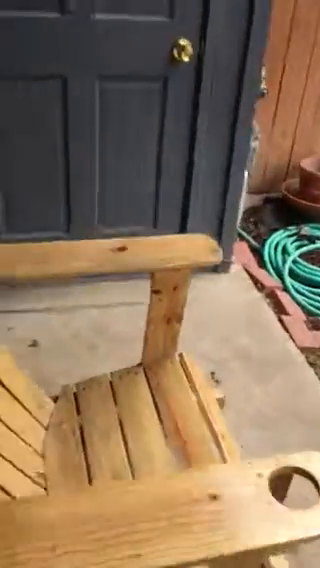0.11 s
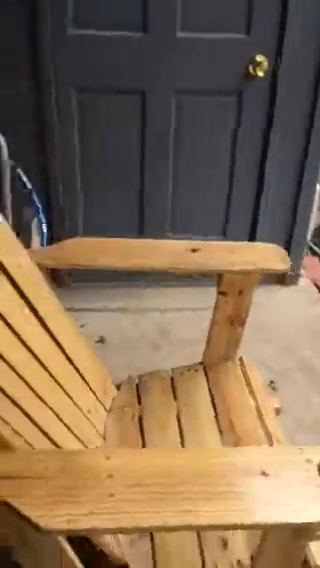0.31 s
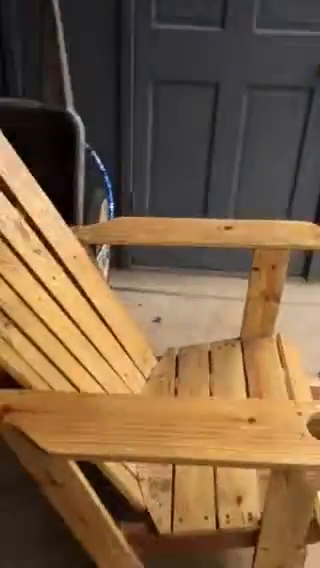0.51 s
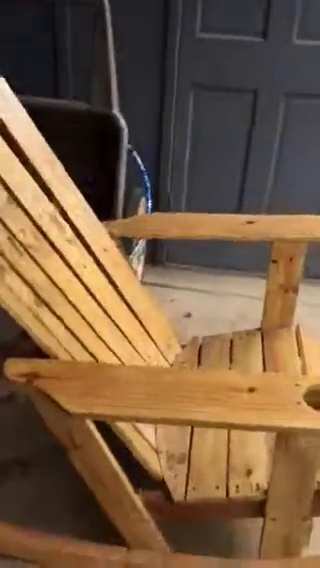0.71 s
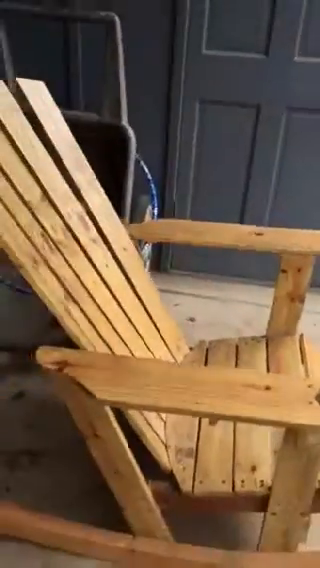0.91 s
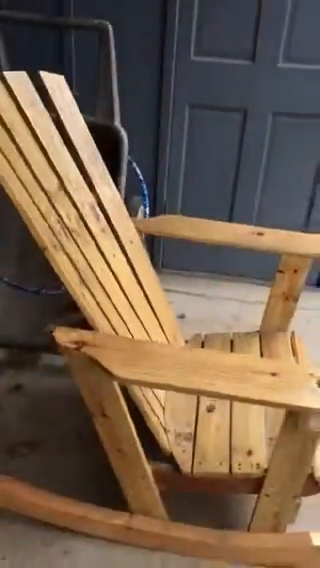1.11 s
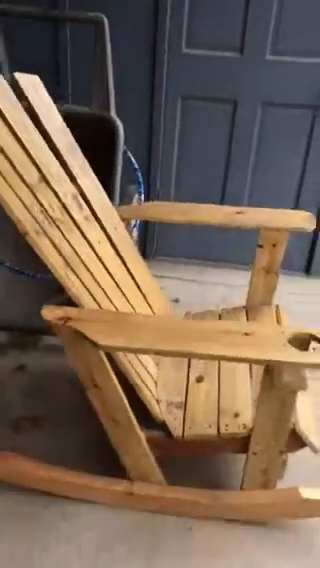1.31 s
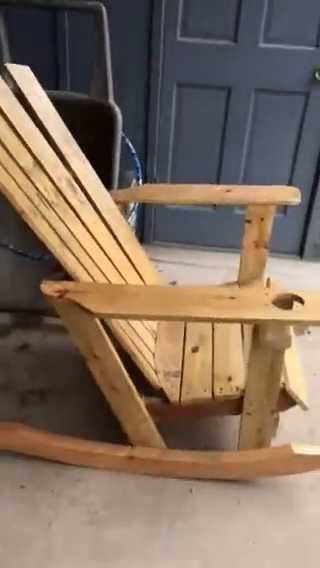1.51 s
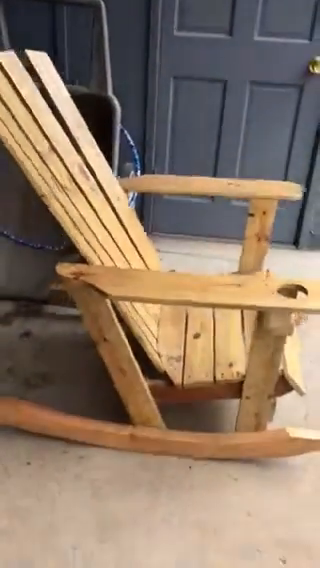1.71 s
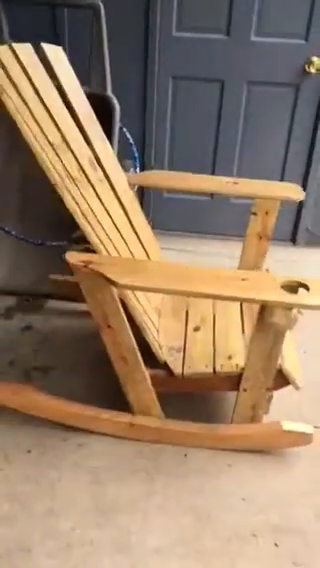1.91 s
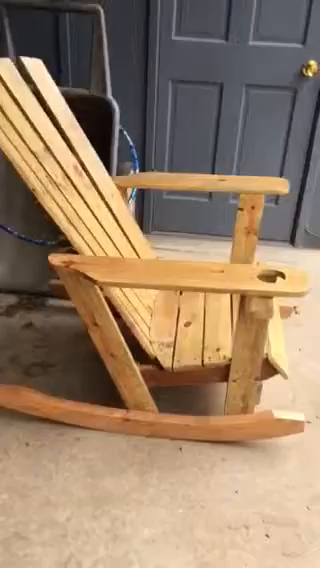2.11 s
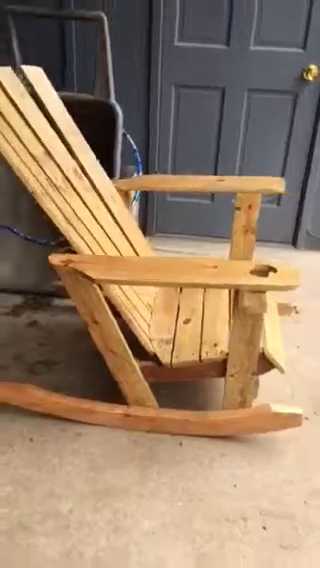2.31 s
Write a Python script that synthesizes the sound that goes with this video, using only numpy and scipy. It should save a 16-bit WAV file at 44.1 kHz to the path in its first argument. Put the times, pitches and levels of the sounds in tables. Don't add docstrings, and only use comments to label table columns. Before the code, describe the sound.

Loose wooden joints of a rocking chair crack and thump over a faint low room hum

```python
import sys
import numpy as np
from scipy import signal
from scipy.fft import rfft, irfft
from scipy.io import wavfile
from scipy.ndimage import uniform_filter1d

SR = 44100
rng = np.random.default_rng(int(sys.argv[2]) if len(sys.argv) > 2 else 0)


def voltage_ratio(decibels):
    exponent = np.asarray(decibels, float) / 20
    return 10 ** exponent


def waveform_to_disk(signal):
    frames = np.transpose(np.atleast_2d(signal))
    scaled = np.clip(frames, -1, 1) * 32767
    samples = np.round(scaled).astype(np.int16)
    wavfile.write(sys.argv[1], SR, samples)


N = 110250
T = np.arange(N) / SR

# start in seconds, crack level in dB, wood level in dB, wood centre in Hz,
# rattle length in seconds.
JOINT_KNOCKS = [(.164, -50.5, -58.5, 1460, 0.013), (0.2172, -25.5, -44.5, 4270, 0.0054),
                (.218, -63, -41, 960, 0.019), (.2470, -20.5, -28.5, 2780, 0.0075),
                (.248, -47, -31, 1340, 0.012), (0, -82, -72.5, 3150, 0.034), (.538, -69, -46.5, 850, 0.02),
                (0.5393, -28.5, -31, 2150, 0.005), (0.5593, -27, -39, 1850, 0.0047),
                (0.7157, -37.5, -48, 1770, 0.0059), (.718, -79, -55, 960, 0.0068),
                (1.044, -39.5, -61.5, 2630, 0.0039), (1.05, -63, -56, 1430, 0.045),
                (1.078, -43.5, -65, 2900, 0.018), (1.5132, -40, -44, 4950, 0.001),
                (1.5159, -72, -38.5, 1690, 0.0011), (1.339, -65, -61, 1260, 0.032),
                (1.473, -57, -61, 1830, 0.071), (.249, -76, -47, 604, 0.042), (1.88, -83, -65, 1340, 0.015),
                (2.058, -80, -59.5, 1080, 0.04), (2.1477, -76, -65, 1480, 0.042),
                (2.263, -69, -65, 840, 0.074)]
MORE_KNOCKS = [(.205, -83, -44, 150, 0.023), (.218, -60, -44, 2070, 0.015),
               (.2485, -48, -35.5, 2040, 0.021), (.25, -80, -39, 546, 0.016),
               (.2535, -32.5, -33, 4160, .008), (.2635, -41.5, -45, 3520, .006),
               (.533, -90, -44.5, 342.6, 0.05), (.537, -36, -35, 3240, 0.0066),
               (.567, -48, -48, 2000, 0.0069), (.575, -80, -47, 212, 0.038),
               (1.0445, -86, -54, 1640, 0.0023), (1.125, -90, -50.5, 200, 0.035),
               (1.365, -93, -49.5, 278, 0.013), (1.494, -74, -56, 1500, .003),
               (1.505, -80, -55, 1900, 0.0018), (1.514, -80, -49.5, 1030, .008),
               (1.5145, -69, -50.5, 3520, 0.0051), (1.5184, -70, -43.5, 1790, 0.0011),
               (1.5255, -42, -60, 5830, 0.0043), (1.617, -77, -68, 4200, .002),
               (1.8217, -65, -82, 2800, 0.0024), (2.052, -76, -61.5, 1390, 0.0023),
               (2.056, -80, -70, 4360, 0.026), (1.7, -58, -78, 3240, 0.0026),
               (2.149, -79, -64, 3300, 0.014), (2.257, -63, -84, 3000, 0.0083),
               (2.2655, -90, -59, 820, .004)]
# frequency in Hz, level in dB.
CRACK_COLOUR = [(1000, -29), (3000, -4.5), (6000, 0.5), (10000, -3), (16000, -12)]
# start in seconds, pitch in Hz, level in dB, t60 in seconds.
SLAT_RINGS = [(0.218, 1017, -38, 0.084), (.2175, 2070, -41.5, 0.056), (.2175, 5960, -47, 0.027),
              (0.217, 6640, -37, .018), (.219, 3500, -34.5, 0.033), (.25, 1240, -42.5, 0.074),
              (.252, 1558, -44.5, 0.18), (.254, 2324, -40.5, 0.078), (.475, 1840, -37, 0.0091),
              (.539, 2220, -35, 0.044), (0.538, 2590, -49, 0.02), (0.541, 1882, -36.5, 0.097),
              (0.551, 1224, -46.5, 0.085), (.716, 887, -48, 0.042), (.716, 2082, -61, 0.17),
              (1.044, 2705, -52.5, 0.035), (1.045, 4360, -58, 0.034), (1.078, 3540, -52.5, 0.031),
              (1.076, 4600, -67, 0.062), (1.078, 5810, -59.5, 0.054), (1.5145, 1310, -50, 0.046),
              (1.5145, 2150, -56, .06), (1.515, 4210, -58, 0.069), (1.5158, 1620, -54, .05),
              (1.525, 1755, -61, .25)]
# start in seconds, low mode in dB, middle modes in dB,
# upper modes in dB, roll length in seconds.
FRAME_THUDS = [(0.043, -59.5, -64, -63.5, 0.044), (0.2, -43.5, -40.5, -45.5, 0.012),
               (0.226, -56, -55, -44.5, 0.071), (0.396, -51.5, -58, -67, 0.013),
               (0.529, -39, -32.5, -35, 0.02), (0.628, -50, -46.5, -49.5, 0.021),
               (1.041, -47.5, -57, -78, 0.024), (1.081, -45, -44.5, -50, 0.039),
               (1.343, -48.5, -46, -43, 0.011), (1.364, -40, -40, -47.5, 0.013),
               (1.484, -55, -52.5, -63, 0.042), (1.698, -55.5, -56.5, -69, 0.084),
               (1.854, -49, -47, -62, 0.051), (2.114, -45.5, -39, -49.5, 0.029),
               (2.136, -44.5, -39.5, -43.5, 0.031), (2.193, -44.5, -47, -51.5, 0.013)]
# pitch in Hz, level in dB, t60 in seconds.
FRAME_MODES = [(58.4, 6.5, 0.22), (106.2, -4, 0.45), (127.6, -2.5, 0.34), (282.4, -4, 0.24),
               (247.4, -9.5, 0.12), (354.3, -7, 0.03), (445.2, -17, 0.042)]
# start in seconds, level in dB, scrape length in seconds.
GRIT_TICKS = [(0.056, -53.5, 0.0025), (0.117, -53.5, 0.0024), (0.21, -40.5, 0.0025), (0.299, -63, 0.51),
              (0.523, -46, 0.014), (0.532, -34, 0.005), (0.572, -53, 0.086), (0.6276, -39, 0.0019),
              (0.705, -29, 0.00076), (0.742, -41, 0.0024), (1.365, -47, 0.0025), (1.373, -59, 0.013),
              (1.389, -42.5, 0.0014), (1.455, -59, 0.026), (1.51, -52, 0.0016), (1.805, -56.5, 0.0045),
              (1.827, -59.5, 0.0073), (1.835, -56, 0.0051), (1.873, -52, 0.0073), (2.057, -65.5, 0.051),
              (2.1065, -61, 0.012), (2.144, -56.5, 0.015), (2.194, -61, 0.0067), (2.237, -61, 0.029),
              (2.277, -45, 0.0018), (2.302, -51, 0.003)]
# frequency in Hz, level in dB.
GRIT_COLOUR = [(700, 13.5), (2000, 10), (4500, 0.5), (6000, 6.5), (7500, -2), (9300, 3.5), (12000, -4.5),
               (16000, -6)]
# frequency in Hz, t60 in seconds.
ROOM_DECAY = [(200, 0.2), (1000, 0.21), (3000, 0.21), (8000, 0.15), (14000, 0.16)]
# frequency in Hz, level in dB per Hz.
AIR_COLOUR = [(15, -20), (25, -0.5), (82, -2.5), (141, -10), (887, -23.5), (1190, -26), (2990, -40.5),
              (3620, -40), (16000, -52)]
# time in seconds, level in dB.
AIR_SWELL = [(0, 0.5), (.35, 2.5), (.7, 3), (1.1, 2.5), (1.7, 0.5), (2.5, 2.5)]
# time in seconds, level in dB.
HUM_LEVEL = [(0, -61.5), (.6, -53), (.8, -53), (1.3, -55), (1.6, -61), (2.5, -60.5)]


def unit(x):
    return x / np.sqrt(np.mean(x ** 2) + 1e-30)


def loud(x, span_s):
    return x / np.sqrt(uniform_filter1d(x ** 2, int(span_s * SR)).max() + 1e-30)


def read(table, hz):
    f, v = np.array(table, float).T
    return np.interp(np.log(np.maximum(hz, 1)), np.log(f), v)


def colour(x, table):
    n = x.shape[-1]
    return irfft(rfft(x) * voltage_ratio(read(table, np.fft.rfftfreq(n, 1 / SR))), n)


def octave_weight(hz, centre):
    return np.maximum(1 - abs(np.log2((hz + 1) / centre)), 0)


def ring(x, hz, t60):
    pole = np.exp(2j * np.pi * hz / SR - np.log(1000) / (max(t60, 1e-3) * SR))
    return signal.lfilter([1], [1, -pole], x).imag


def walk(rate):
    k = int(SR / rate)
    steps = np.repeat(rng.standard_normal(N // k + 1), k)
    return unit(uniform_filter1d(uniform_filter1d(steps, k), k)[:N])


def add(out, x, start):
    i = int(start * SR)
    out[i:i + len(x)] += x[:N - i]


def slat_modes(rattle, centre_hz, draws):
    spread_octaves, t60_at_1k_s = 0.44, 0.022
    modes = 0
    for k, hz in enumerate(np.geomspace(110, 15000, 150)):
        octaves = np.log2(hz / centre_hz)
        if abs(octaves) < 2.5 * spread_octaves:
            detuned_hz = hz * (1 + 0.012 * draws[-1 - k])
            mode = unit(ring(rattle, detuned_hz, t60_at_1k_s * (1000 / hz) ** 0.5))
            modes = modes + np.sign(draws[k]) * np.exp(-0.5 * (octaves / spread_octaves) ** 2) * mode
    return modes


def knocks(table):
    crack_s, crack_rise_s = 0.00085, 0.00029
    out, t = np.zeros(N), T[:8192]
    for start, crack_db, wood_db, centre_hz, length in table:
        crack_noise, rattle_noise, draws = rng.standard_normal((3, len(t)))
        crack_shape = np.exp(-t / crack_s) + 0.3 * np.exp(-t / length)
        crack = unit(colour(crack_noise, CRACK_COLOUR)) * crack_shape * (1 - np.exp(-t / crack_rise_s))
        rattle_shape = np.exp(-t / length) * (1 - np.exp(-t / (0.24 * length)))
        rattle = rattle_noise * abs(rattle_noise) * rattle_shape
        wood = loud(slat_modes(rattle, centre_hz, draws), 0.0053)
        add(out, voltage_ratio(crack_db) * crack + voltage_ratio(wood_db) * wood, start)
    return out


def slat_rings():
    out, t = np.zeros(N), T[:16384]
    for start, hz, db, t60 in SLAT_RINGS:
        envelope = voltage_ratio(db + 5.5 - 60 * t / t60) * (1 - np.exp(-t / 0.0024))
        add(out, envelope * np.sin(2 * np.pi * hz * t), start)
    return out


def thuds():
    rise_s, wobble_db = 0.0045, 3.5
    out, t = np.zeros(N), T[:16384]
    for start, low_db, mid_db, top_db, length in FRAME_THUDS:
        for hz, db, t60 in FRAME_MODES:
            group_db = low_db if hz < 85 else mid_db if hz < 180 else top_db
            detune, phase = rng.standard_normal(2)
            shudder = np.interp(t, np.arange(40) * 0.012, rng.standard_normal(40))
            rise = np.sin(np.pi / 2 * np.clip(t / rise_s, 0, 1)) ** 2
            decay = voltage_ratio(-60 * np.maximum(t - length, 0) / t60)
            level = voltage_ratio(group_db + db + 0.5 + wobble_db * shudder)
            turns = np.cumsum(hz * (1 + 0.013 * detune + 0.042 * shudder[::-1])) / SR
            add(out, level * rise * decay * np.sin(2 * np.pi * turns + 2 * phase), start)
    return out


def grit():
    grain_db, rise_s = 6, 0.0011
    out, t = np.zeros(N), T[:12288]
    for start, db, length in GRIT_TICKS:
        noise, unevenness = rng.standard_normal((2, len(t)))
        grains = unit(colour(noise * voltage_ratio(grain_db * unevenness), GRIT_COLOUR))
        shape = np.exp(-t / max(length, 3e-4)) * (1 - np.exp(-t / rise_s))
        add(out, voltage_ratio(db) * grains * shape, start)
    return out


def squeak():
    middle_s, spread_s = 0.94, 0.21
    rub = unit(ring(rng.standard_normal(N), hz=3070, t60=0.012))
    return voltage_ratio(-80.5) * rub * np.exp(-0.5 * ((T - middle_s) / spread_s) ** 2)


def walls():
    room_db, gap_s, late_db, late_stretch = -5, 0.0013, -21, 3
    n, tail = 32768, 0
    t, hz = T[:n], np.fft.rfftfreq(n, 1 / SR)
    for centre in 125 * 2.0 ** np.arange(8):
        band = irfft(rfft(rng.standard_normal(n)) * octave_weight(hz, centre) ** 0.5, n)
        fall_db = -60 * t / read(ROOM_DECAY, centre)
        tail = tail + band * (voltage_ratio(fall_db) + voltage_ratio(late_db + fall_db / late_stretch))
    spectrum = rfft(tail)
    power = abs(spectrum) ** 2
    even = np.sqrt(uniform_filter1d(power, 1500) / uniform_filter1d(power, 120))
    tail = irfft(spectrum * np.where(hz > 900, even, 1), n)
    tail = tail * (1 - np.exp(-t / gap_s))
    return voltage_ratio(room_db) * tail / np.sqrt(np.sum(tail ** 2))


def air():
    level_db, flicker_db = -57.5, -0.5
    hz, out = np.fft.rfftfreq(N, 1 / SR), 0
    noise = rfft(colour(rng.standard_normal(N), AIR_COLOUR))
    for centre in 23 * 2.0 ** np.arange(10):
        band = irfft(noise * octave_weight(hz, centre), N)
        out = out + band * voltage_ratio(flicker_db * walk(14) * min(1, (500 / centre) ** 0.9))
    return unit(out) * voltage_ratio(level_db + np.interp(T, *np.array(AIR_SWELL).T))


def hum():
    turns = np.cumsum(86 * (1 + 0.023 * walk(17))) / SR
    level_db = np.interp(T, *np.array(HUM_LEVEL).T) + 1.5 * walk(2.8)
    return np.sin(2 * np.pi * turns) * voltage_ratio(level_db)


def scene():
    bright = knocks(JOINT_KNOCKS) + knocks(MORE_KNOCKS) + slat_rings() + grit() + squeak()
    echo = signal.fftconvolve(bright, walls())[:N]
    return (bright + echo + thuds() + air() + hum())[None]


def band_limit(x):
    return signal.sosfilt(signal.butter(12, 16840, fs=SR, output="sos"), x)


def record(dry):
    bass_cut = signal.butter(4, 44.4, "high", fs=SR, output="sos")
    top_cut = signal.ellip(8, 0.2, 40, 15800, fs=SR, output="sos")
    mix = signal.sosfilt(top_cut, signal.sosfilt(bass_cut, dry))
    return band_limit(mix)


dry = scene()
out = record(dry)
waveform_to_disk(out)
```